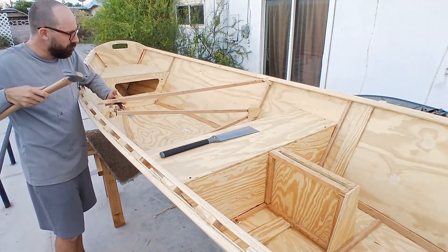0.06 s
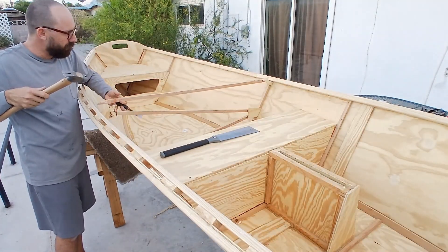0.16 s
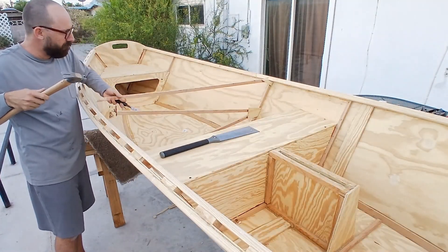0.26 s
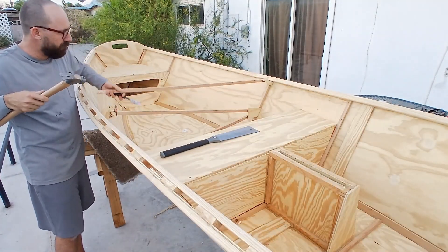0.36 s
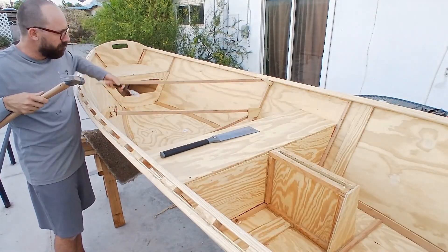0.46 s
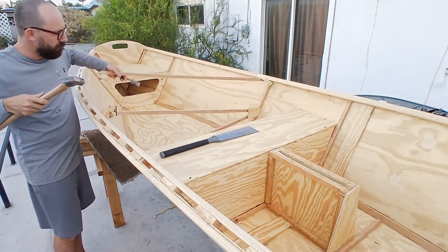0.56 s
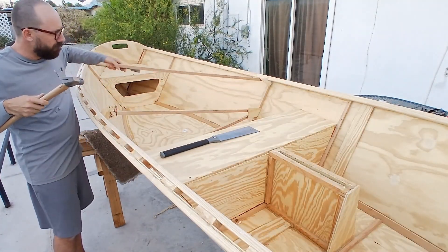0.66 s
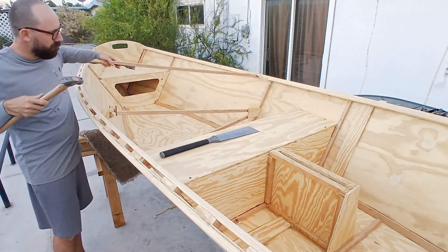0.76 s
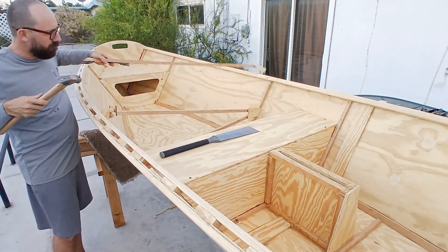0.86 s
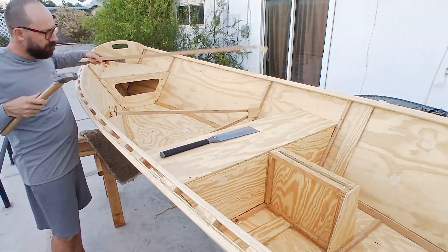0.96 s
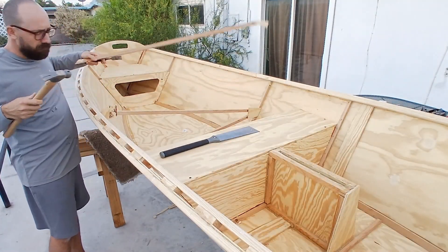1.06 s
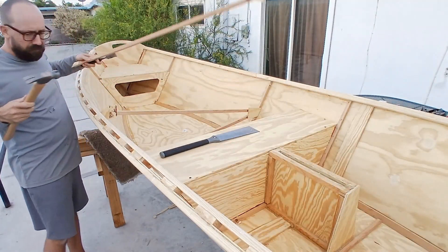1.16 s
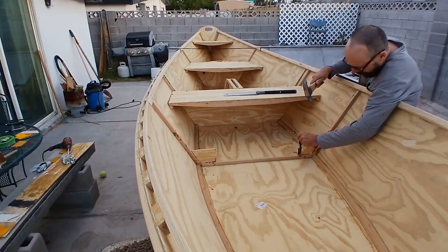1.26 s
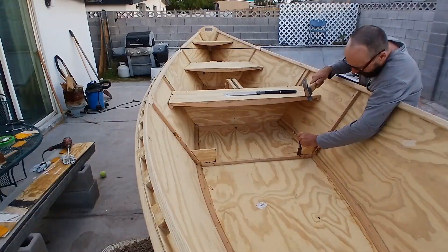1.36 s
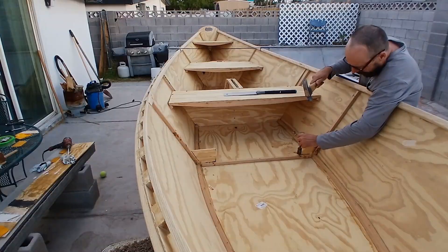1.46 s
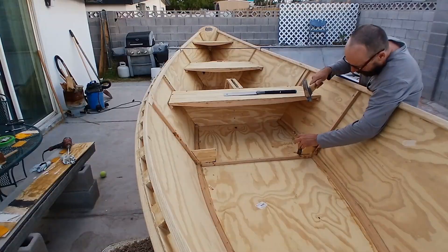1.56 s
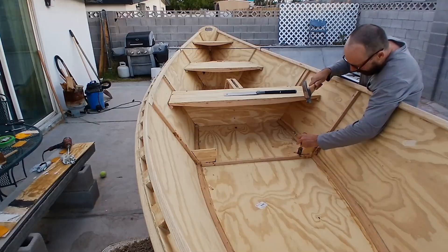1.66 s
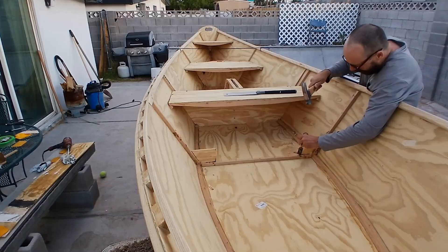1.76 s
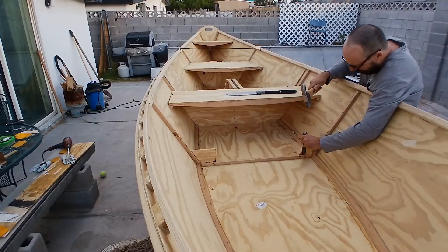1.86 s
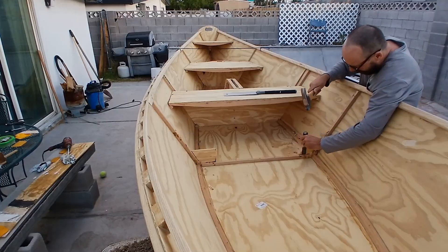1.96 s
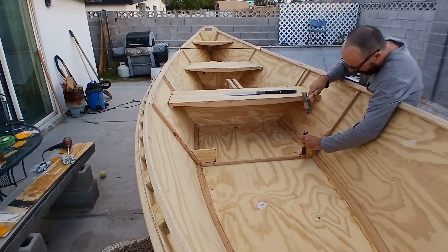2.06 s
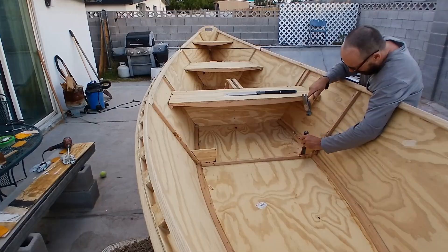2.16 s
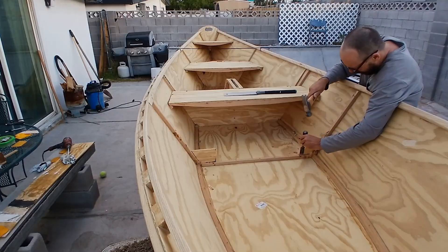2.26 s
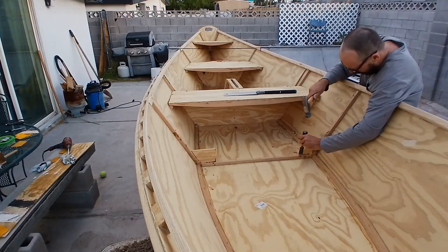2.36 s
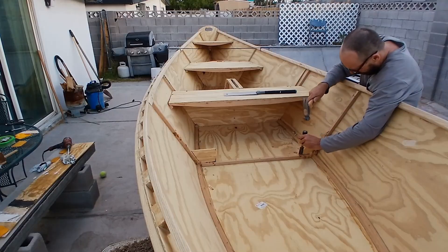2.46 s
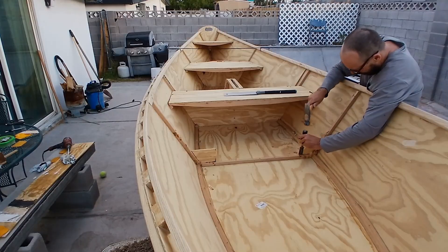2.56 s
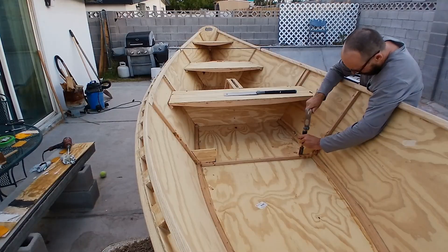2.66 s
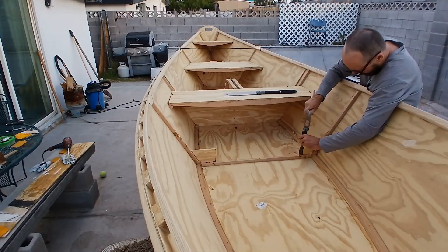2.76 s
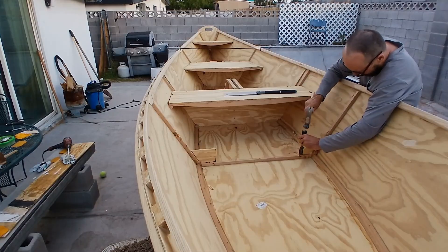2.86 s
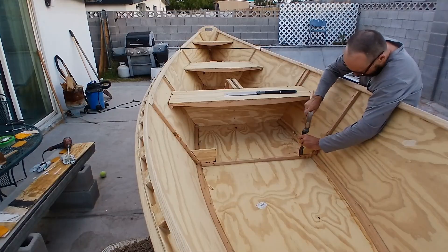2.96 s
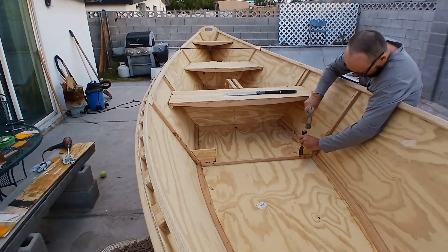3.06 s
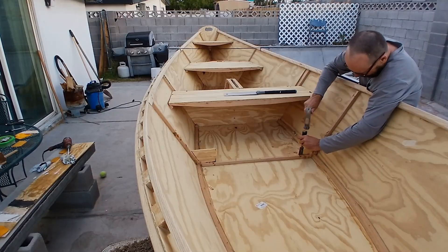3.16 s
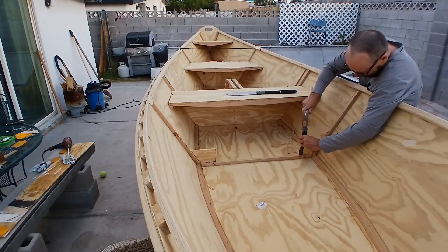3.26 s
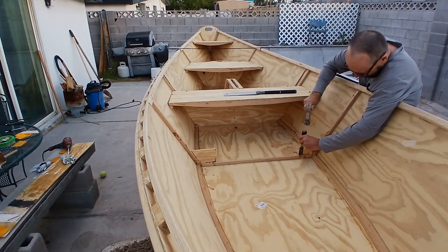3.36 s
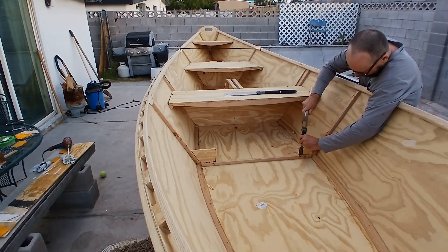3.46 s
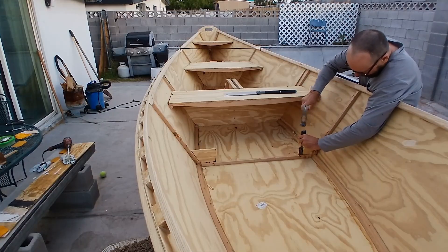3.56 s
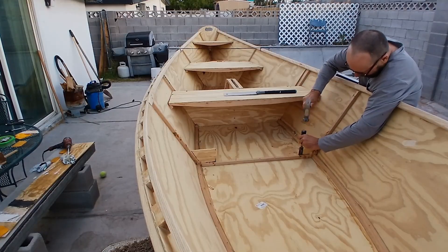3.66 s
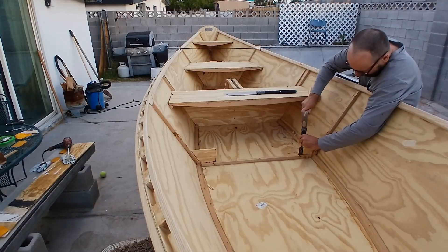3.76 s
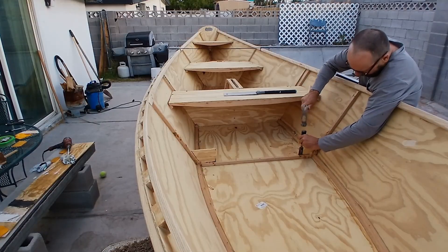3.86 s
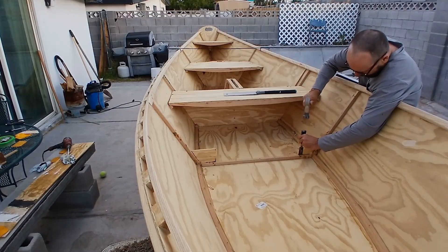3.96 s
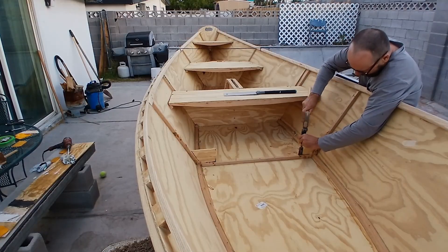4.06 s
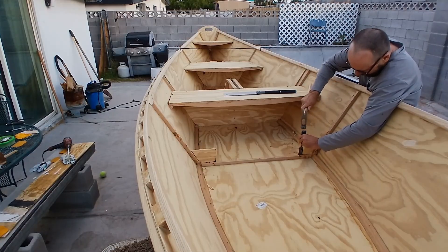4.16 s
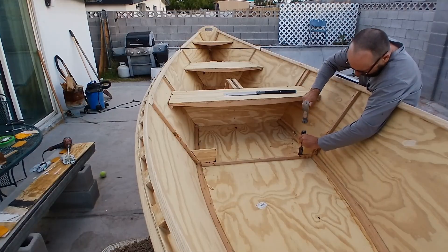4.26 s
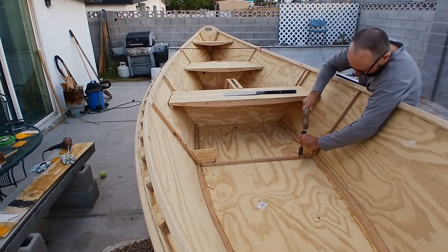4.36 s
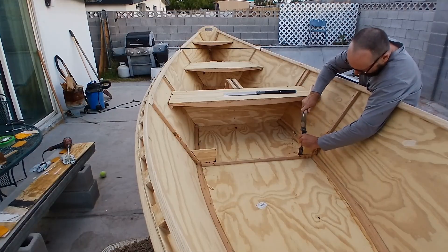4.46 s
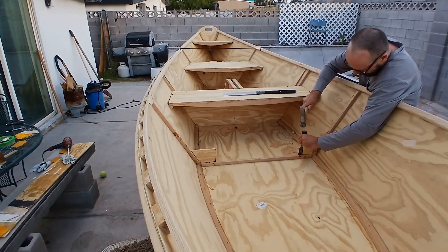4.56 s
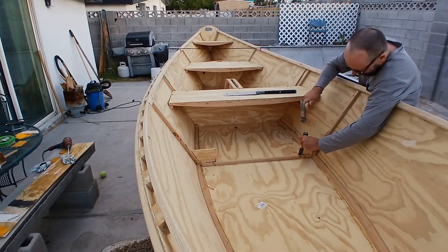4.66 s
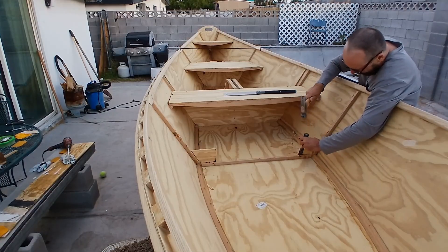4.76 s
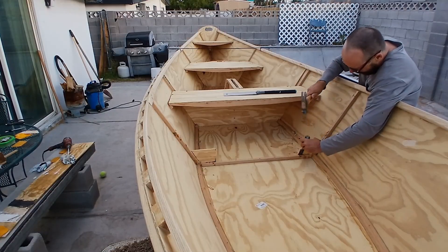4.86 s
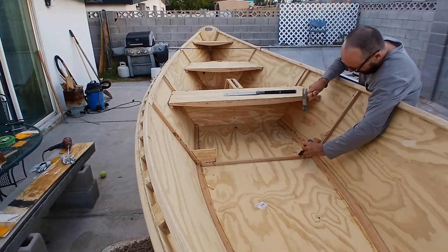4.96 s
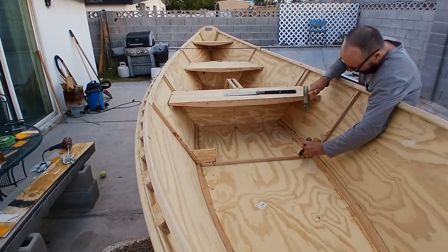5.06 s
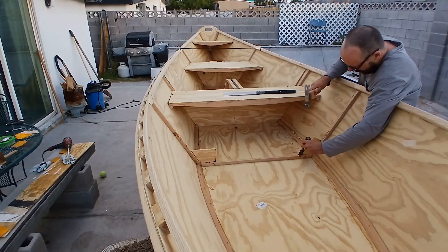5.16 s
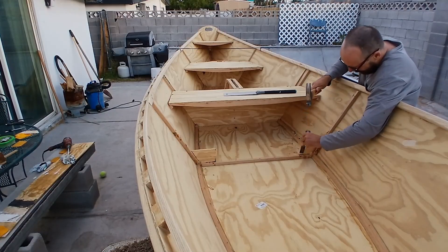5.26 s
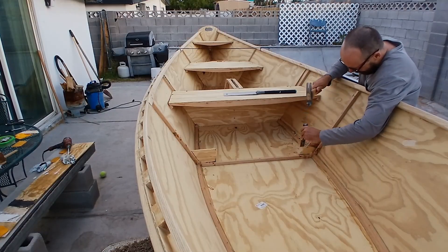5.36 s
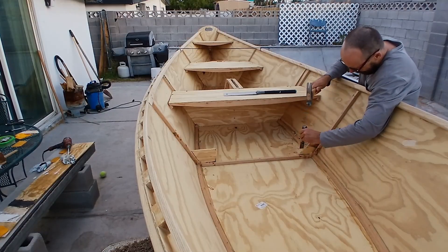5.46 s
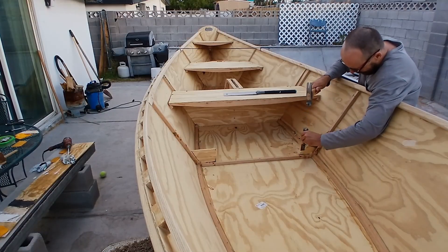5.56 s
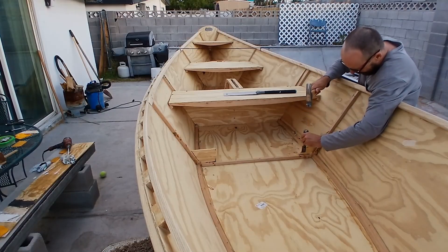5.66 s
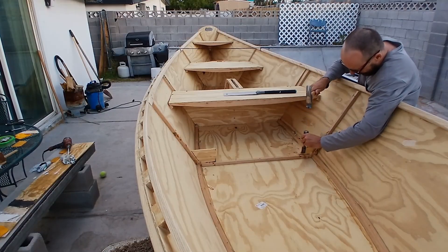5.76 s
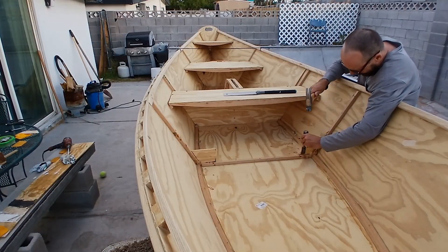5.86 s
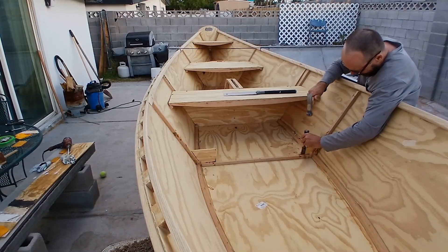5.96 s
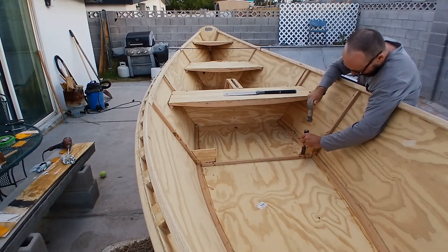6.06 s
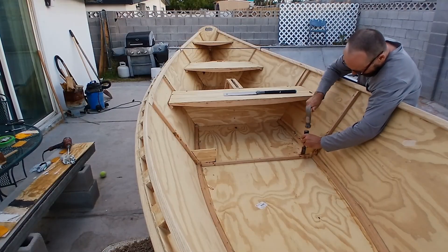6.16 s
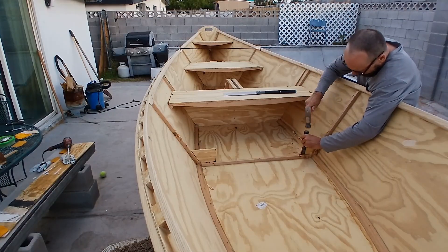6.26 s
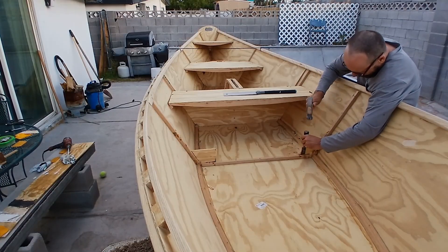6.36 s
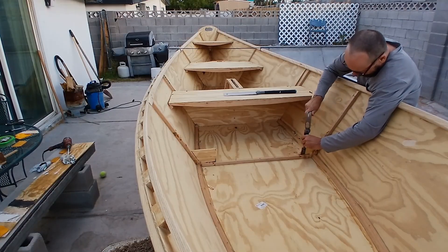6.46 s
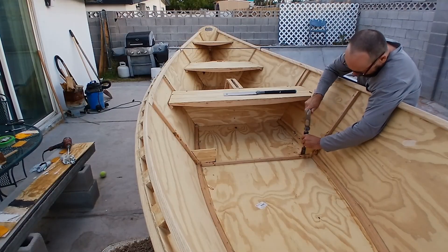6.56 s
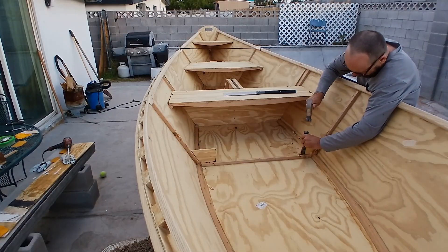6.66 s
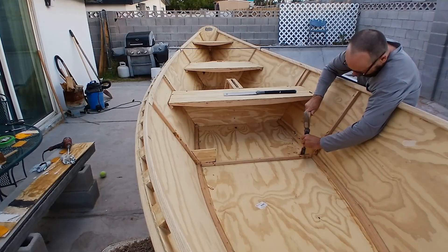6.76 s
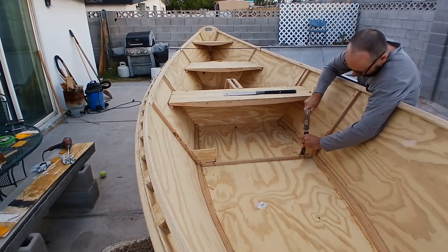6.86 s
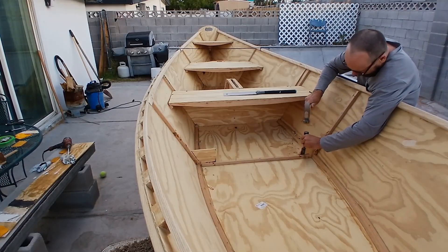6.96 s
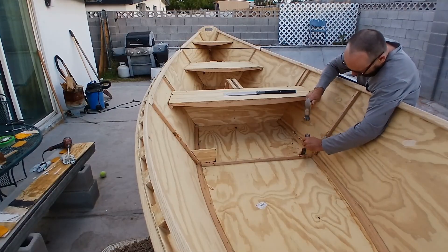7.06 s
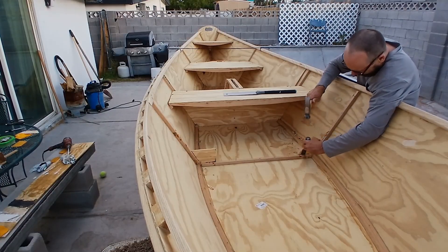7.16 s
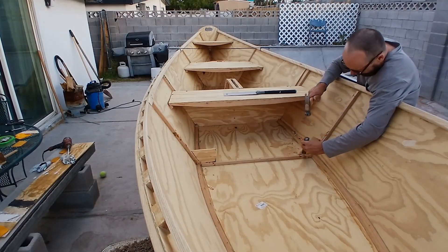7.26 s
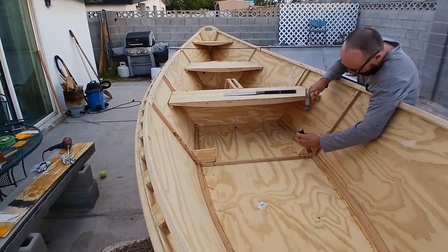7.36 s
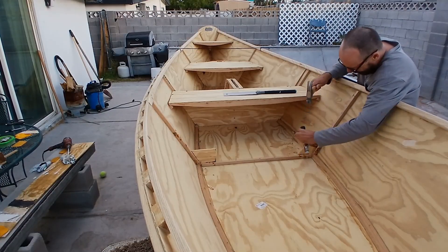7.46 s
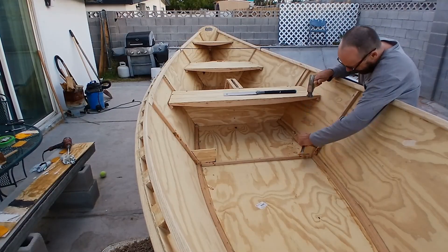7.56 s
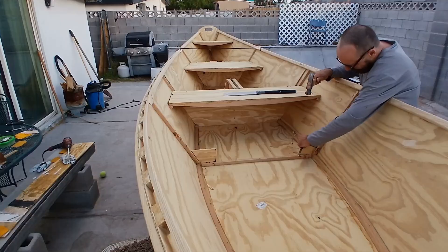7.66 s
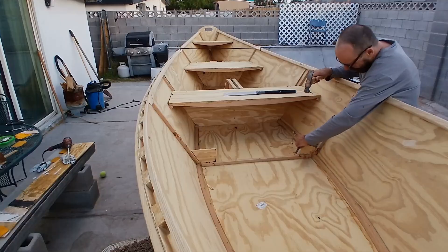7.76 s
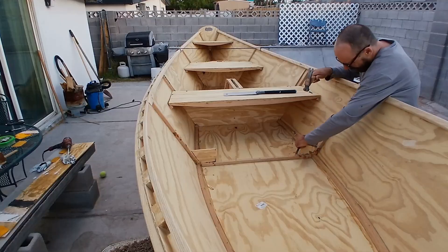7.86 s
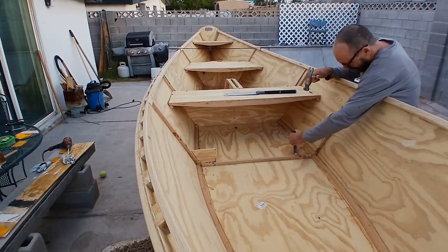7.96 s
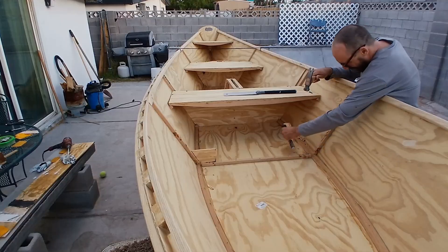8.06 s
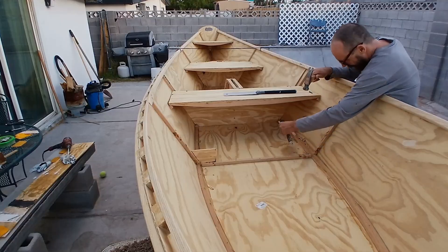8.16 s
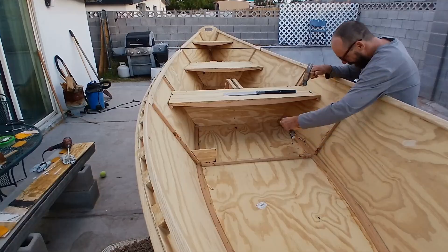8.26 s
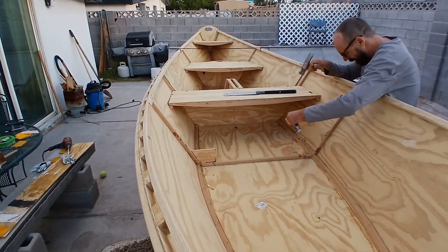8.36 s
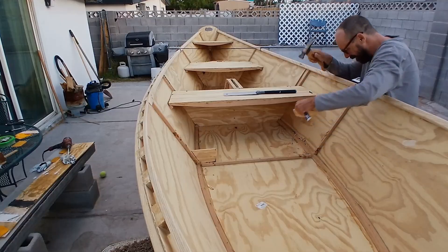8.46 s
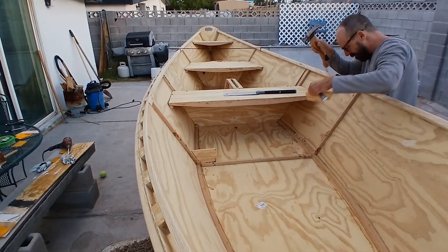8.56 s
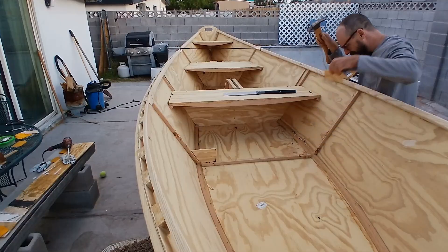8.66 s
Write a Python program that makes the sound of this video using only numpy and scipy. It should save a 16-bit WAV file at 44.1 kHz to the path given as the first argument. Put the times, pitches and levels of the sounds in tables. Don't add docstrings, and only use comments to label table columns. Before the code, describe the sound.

In a walled yard, two runs of loud hammer-on-chisel cracks shake a wooden hull, between light tool ticks, scuffs and faint traffic rumble.

```python
import sys
import numpy as np
from scipy import signal
from scipy.fft import irfft, next_fast_len
from scipy.io import wavfile
from scipy.ndimage import uniform_filter1d

SR = 44100
rng = np.random.default_rng(int(sys.argv[2]) if len(sys.argv) > 2 else 0)


def master(y):
    cut = np.clip(np.atleast_2d(y).T, -1, 1)
    pcm = np.round(cut * 32767)
    wavfile.write(sys.argv[1], SR, pcm.astype(np.int16))


def how_loud(loudness_db):
    steps = np.asarray(loudness_db, float) / 20
    return 10 ** steps


N = 383669
TIME = np.arange(N) / SR
GROWTH = TIME / TIME[-1]


def on_log(table, hz):
    f, v = np.transpose(table)
    return np.interp(np.log(hz), np.log(f), v)


def bass_share(hz):
    return np.clip(np.log2(1800 / hz), 0, 1)


def treble_share(hz):
    return np.clip(np.log2(hz / 4000), 0, 1)


def band_noise(hz, count):
    size = next_fast_len(N)
    f = np.fft.rfftfreq(size, 1 / SR)
    lo, hi = np.searchsorted(f, [hz * 2 ** (-1 / 3), min(hz * 2 ** (1 / 3), 16400)])
    window = np.cos(np.pi / 2 * 3 * np.log2(f[lo:hi] / hz))
    window = window * how_loud(-12 * (f[lo:hi] > 15850))
    draws = rng.standard_normal((count, hi - lo)) + 1j * rng.standard_normal((count, hi - lo))
    spec = np.zeros((count, len(f)), complex)
    spec[:, lo:hi] = window * draws
    return irfft(spec, size)[:, :N] * np.sqrt(size * SR) / 2


def walk(rate):
    k = int(SR / rate)
    held = np.repeat(rng.standard_normal(N // k + 1), k)
    return 1.6 * uniform_filter1d(uniform_filter1d(held, k), k)[:N]


def fades(start_s, level_db, t60_s, rise=0.0024):
    power = np.zeros(N)
    for s, db, t60 in np.broadcast(start_s, level_db, np.clip(t60_s, .004, 2)):
        i = int(s * SR)
        t = TIME[:min(int(1.2 * t60 * SR), N - i)]
        power[i:i + len(t)] += how_loud(2 * (db - 60 * t / t60)) * (1 - np.exp(-t / rise)) ** 2
    return np.sqrt(power)


BITE_S = .006


def ring(modes, gain, build, sag=0):
    hz, db, t60 = np.transpose(modes)[:3, :, None]
    t = TIME[:int(min(.9, 1.3 * np.max(t60)) * SR)]
    cycles = hz * (t + sag * BITE_S * (1 - np.exp(-t / BITE_S)))
    size = how_loud(db - 60 * t / t60) * (1 - np.exp(-t * hz / build))
    return gain @ (size * np.sin(2 * np.pi * cycles))


LEFT_LAG, CHISEL_LAG = 6, 3


def add(out, x, s, pan_db, left_lag=LEFT_LAG):
    for ch, lag, db in ((0, left_lag, pan_db / 2), (1, 0, -pan_db / 2)):
        i = int(s * SR) + lag
        x_ch = np.atleast_2d(x)[ch % np.ndim(x), :N - i]
        out[ch, i:i + len(x_ch)] += how_loud(db) * x_ch


def peak(x, db):
    return x * how_loud(db) / np.max(np.abs(x))


PANEL_DB, LOOSE_DB = -20.5, 9.5
SEATED_S, SEATING_S = 3.535, 0.68


def panel_level(s):
    return PANEL_DB - LOOSE_DB * np.clip((SEATED_S - s) / SEATING_S, 0, 1)


DUCK_DB, DUCK_SHARE = 18, .27
DUCK_ATTACK_S, DUCK_HOLD_S, DUCK_RELEASE_S = .06, 1, 0.41
CLICK_S, CLICK_DB = 1.2592, -29
BEFORE_CLICK_DB = 0.5


def duck():
    out = np.zeros(N)
    for s in np.array(BLOWS)[:, 0]:
        i = int(s * SR)
        t = TIME[:N - i]
        pulled = out[i] + DUCK_SHARE * (DUCK_DB - out[i]) * (1 - np.exp(-t / DUCK_ATTACK_S))
        out[i:] = pulled * np.exp(-np.maximum(t - DUCK_HOLD_S, 0) / DUCK_RELEASE_S)
    return out + BEFORE_CLICK_DB * (TIME < CLICK_S)


# pitch_hz, level_db (per Hz)
HISS = [(5000, -33), (8500, -17), (11000, -1), (13000, 0), (18000, 1)]
# pitch_hz, level_db
MIC = [(5000, 1), (7500, 1), (10000, 6.5), (12800, -9.5), (16000, -2.5)]
HISS_DB = -67


def hiss(hz, duck_db):
    return how_loud(HISS_DB - duck_db + on_log(HISS, hz) - on_log(MIC, hz) - 39.0)


# pitch_hz, level_db (per Hz)
STREET = [(15, -73), (25, -41), (43, -20.5), (67, -8.5), (92, -9.5), (160, -21), (273, -20.5), (323, -25),
          (499, -30), (536, -29), (828, -31), (1600, -39.5), (4000, -56.5), (6500, -67.5), (10400, -91),
          (17600, -120)]
STREET_DB, STREET_SWELL_DB, STREET_BRIGHTER_DB = -54.5, 6, 4.5
STREET_DUCK, DRONE_DUCK = 0.68, .6


def street(hz, duck_db):
    flicker_db = .8 * walk(9)
    level_db = STREET_DB + STREET_SWELL_DB * GROWTH - STREET_DUCK * duck_db
    brighter_db = STREET_BRIGHTER_DB * (1 - bass_share(hz)) * GROWTH
    return how_loud(level_db + on_log(STREET, hz) + 0.5 + flicker_db + brighter_db)


# time_s, pitch_hz
DRONE_HZ = [(0, 84.83), (1.25, 85.5), (1.4, 80.37), (2.0, 112.3), (2.3, 99.57), (5.5, 94.5), (7, 91.25),
            (8.7, 85.93)]
# time_s, level_db
DRONE_DB = [(0, -43), (.46, -34.5), (.89, -54), (1.19, -35.5), (1.5, -25.5), (1.94, -33), (2.62, -35),
            (4.5, -35.5), (4.94, -36.5), (5.3, -39.5), (6.08, -27), (7.05, -27), (7.39, -29), (7.8, -29.5),
            (7.97, -35.5), (8.38, -29.5), (8.7, -29.5)]
# time_s, left_minus_right_db
DRONE_PAN_DB = [(0, -1.6), (7.6, -1.4), (8.1, 0), (8.7, 0)]
SWAY_DB, SWAY_RISE_S, SWAY_T60_S = -11.5, 0.14, 0.7


def drone(duck_db):
    hz = np.interp(TIME, *np.transpose(DRONE_HZ)) * (1 + 0.022 * walk(3))
    slow_filter = signal.butter(3, 10, fs=SR, output="sos")
    slow = signal.sosfilt(slow_filter, rng.standard_normal((2, N)))
    x = np.real((slow[0] + 1j * slow[1]) * np.exp(2j * np.pi * np.cumsum(hz) / SR))
    s, _, hull_db = np.transpose(BLOWS)[:3]
    engine = how_loud(np.interp(TIME, *np.transpose(DRONE_DB)))
    sway = fades(s, hull_db + SWAY_DB, SWAY_T60_S, rise=SWAY_RISE_S)
    size = np.hypot(engine, sway) * how_loud(-DRONE_DUCK * duck_db - 2.0)
    pan_db = np.interp(TIME, *np.transpose(DRONE_PAN_DB)) * [[.5], [-.5]]
    return x / np.std(x) * size * how_loud(pan_db)


# start_s, length_s, from_hz, to_hz, level_db
BIRD = [
    (5.128, .055, 4080, 3080, -80),
    (5.187, .057, 3100, 2770, -77),
]


def bird():
    out = np.zeros(N)
    flutter, waver = how_loud(3.0 * walk(90)), 1 + .012 * walk(120)
    for s, length, from_hz, to_hz, db in BIRD:
        share = np.clip((TIME - s) / length, 0, 1)
        hz = from_hz + (to_hz - from_hz) * share ** 2
        tone = np.sin(2 * np.pi * np.cumsum(hz * waver) / SR)
        out += how_loud(db) * np.sin(np.pi * share) * flutter * tone
    return out


# start_s, length_s, pitch_hz, level_db
CREAKS = [(3.6, .04, 1500, -66), (0.625, 0.075, 8600, -70), (2.19, .04, 2700, -66), (2.245, .03, 3600, -68),
          (2.285, 0.04, 3000, -64), (3.984, 0.018, 3026, -58), (3.979, 0.035, 1514, -64),
          (4.012, .025, 3282, -66), (4.155, .03, 2450, -62), (4.2, .08, 1400, -65), (4.2, .04, 4000, -64),
          (4.93, .02, 2400, -62), (5.265, 0.06, 980, -58), (5.28, .035, 4750, -60),
          (5.281, 0.055, 3650, -60), (5.345, .015, 3700, -57), (5.31, 0.05, 1700, -66),
          (5.36, 0.032, 700, -58), (5.308, 0.025, 2650, -59), (5.34, 0.025, 2300, -62),
          (5.325, 0.05, 720, -48), (5.345, 0.026, 370, -54), (5.372, .02, 310, -53), (6.85, .06, 1500, -63),
          (7.02, .03, 3800, -66)]
CREAK_BLUR_HZ, CREAK_STEADY = 1500, .6


def creaks():
    out, grip = np.zeros((2, N)), walk(220) + 1j * walk(300)
    for row, (s, length, hz, db) in enumerate(CREAKS):
        t = TIME[:int(length * SR)]
        steps = row * 9973 + t * SR * max(hz / CREAK_BLUR_HZ, .5)
        own_grip = grip[steps.astype(int) % N]
        tone = np.imag((CREAK_STEADY + own_grip) * np.exp(2j * np.pi * hz * t))
        add(out, how_loud(db + 6.0) * np.sin(np.pi * t / length) * tone, s, -2.5)
    return out


def bare_click():
    out = np.zeros((2, N))
    out[:, int(CLICK_S * SR):][:, :40] += how_loud(CLICK_DB) * np.exp(-np.arange(40) / 5)
    return out


# start_s, length_s, level_db, over_6khz_db, under_1500hz_db
SCUFFS = [(0.393, 0.18, -47, -8, 2), (0.598, 0.15, -58.5, 4, -18), (.92, .045, -78, 18.5, -3),
          (0.993, .035, -74.5, 13.5, -3), (1.313, 0.054, -58, -8, 13), (1.785, 0.2, -52, -1.5, 0),
          (2.16, 0.13, -56, -8, 13.5), (2.296, 0.069, -57.5, -6, -5), (4.6, .19, -58, 2, -6),
          (4.85, 0.12, -56, 2, 6), (5.242, 0.17, -48, -8, 10), (6.84, .42, -62, -15, -3),
          (7.315, 0.38, -66.5, 2.5, -3), (7.72, .15, -63, -4, -3), (7.879, 0.059, -41.5, -2, 9),
          (8.354, 0.13, -65.5, 8, -13)]
SCUFF_GRIP, SCUFF_LIFT, SCUFF_EASE_DB = .3, .38, 3


def scuff_levels():
    rows = []
    shape = ((0, -30), (SCUFF_GRIP, 0), (1 - SCUFF_LIFT, -SCUFF_EASE_DB), (1, -30))
    for s, length, db, high_db, low_db in SCUFFS:
        rows.append((s - .001, how_loud(-70), high_db, low_db))
        for share, down_db in shape:
            rows.append((s + share * length, how_loud((db + down_db) / 2), high_db, low_db))
        rows.append((s + length + .001, how_loud(-70), high_db, low_db))
    rows = np.array(rows)
    size, high, low = (np.interp(TIME, rows[:, 0], rows[:, k]) for k in (1, 2, 3))
    return 2 * 20 * np.log10(size), high, low


# pitch_hz, width_hz, level_db
SCUFF_RING = [(720, 50, -3), (970, 67, -23), (2600, 1400, -1), (3600, 300, -6), (4760, 620, -12.5)]
# pitch_hz, level_db (per Hz)
TICK = [(250, -0.5), (600, -5), (2000, -8), (2700, 1), (3400, -1), (4500, -1.5), (7000, -3), (10000, 2.5),
        (16000, -5)]


def scuffs(hz, levels, grit, press):
    level_db, high_db, low_db = levels
    body = sum(how_loud(db) / np.hypot(1, 2 * (hz - f) / (w + hz / 5)) for f, w, db in SCUFF_RING)
    tilt_db = bass_share(hz) * (low_db - 3.5) + treble_share(hz) * (high_db - 8.0 + on_log(TICK, hz))
    thin_db = 4.4 * max(np.log2(600 / hz), 0)
    return grit * press * (0.9 + body) * how_loud(level_db - 47.5 + tilt_db - thin_db)


# start_s, peak_db, under_1200hz_db, over_6khz_db
SPLINTERS = [(0.045, -48.5, -30, -5), (0.3202, -36, 0, -3.5), (0.405, -32.5, -3, 2), (.42, -39, -10, -3),
             (1.351, -40, 14.5, -28), (2.835, -37, 6, -20.5), (3.1242, -33.5, -3, -26),
             (4.5812, -24.5, -28.5, -1), (4.6176, -22, -11.5, -8.5), (4.68, -28.5, -16, -2.5),
             (4.8439, -19, -10.5, -10.5), (5.62, -69, 6, -37), (5.904, -46.5, 13, -22),
             (7.1193, -50, -20, -41), (7.4605, -43, 21.5, -50), (7.779, -34.5, -40, -10.5),
             (8.3005, -44.5, -14, -30)]
# start_s, peak_db, under_1200hz_db, over_6khz_db
TICKS = [(0.1237, -43, 7, -19), (0.4265, -17.5, -13, -3), (0.4327, -19.5, -1.5, -11), (0.689, -52, -20, -4),
         (1.81, -50, -20, -20), (1.8549, -36.5, -4, -16), (2.521, -43.5, -21, -18),
         (2.7104, -40, -13.5, -11), (3.1733, -62, 26, 8), (3.693, -40.5, -0.5, -26),
         (3.9851, -54, -6.5, -36), (4.7524, -43, -29.5, -2), (4.768, -45, -25, -4),
         (4.8231, -38, -18.5, -4.5), (4.8863, -31.5, 2.5, -4), (4.934, -43, -20, -8.5),
         (5.7694, -53.5, 1.5, -15), (7.698, -55, -5, -24), (7.864, -38, 7, -18), (7.9023, -36.5, 3.5, -8),
         (8.058, -53, -15, -20), (8.1883, -56, -15, -10)]
SPLINTER_T60_S, SPLINTER_PAN_DB, TICK_T60_S, TICK_PAN_DB = 0.038, -14, 0.058, -8.5


def ticks(hz, grit):
    rows = [(*row, SPLINTER_T60_S, SPLINTER_PAN_DB) for row in SPLINTERS]
    rows += [(*row, TICK_T60_S, TICK_PAN_DB) for row in TICKS]
    s, peak_db, low_db, high_db, t60, pan_db = np.transpose(sorted(rows))
    high = treble_share(hz)
    band_db = peak_db - 40.5 + bass_share(hz) * (low_db + 5) + high * (high_db - 4) + on_log(TICK, hz)
    snap = fades(s, band_db - 3.5, 0.0024, rise=0.00016)
    snap += fades(s, band_db + 1.0, t60, rise=0.00065)
    snap += fades(s + 0.0074, band_db - 4.5, .006, rise=.0002)
    side_db = .5 * np.interp(TIME, s, pan_db)
    direct = grit * snap * how_loud(np.array([side_db, -side_db]) / (2 + 2.3 * high))
    echo = fades(s, band_db - 11.5, 3.86 * t60, rise=0.0013)
    return direct, echo


# start_s, peak_db, pitch_hz, t60_s
PINGS = [(.0445, -45, 4080, .04), (.0445, -49, 4600, .05), (.0445, -53, 5130, .04), (.083, -54, 4080, .05),
         (.083, -59, 4600, 0.04), (.122, -58, 4600, .04), (.172, -61, 5100, 0.04), (.176, -60, 4100, .04),
         (.3215, -32, 4530, 0.018), (.4054, -28, 9200, 0.0046), (.4054, -27.5, 13500, .004),
         (.4056, -32, 3580, .012), (.412, -42, 3600, .015), (.4266, -15.5, 8000, 0.0052),
         (.4268, -25, 11000, .005), (.4312, -19.5, 2500, .012), (.4312, -21, 7800, 0.0087),
         (.4325, -25, 13500, 0.0074), (.4378, -23, 4005, .008), (.6875, -52, 8300, .01),
         (1.811, -50, 3500, .03), (1.855, -43, 4600, 0.065), (4.583, -28, 4950, 0.017),
         (4.6177, -17, 3850, .012), (4.684, -31, 9800, 0.024), (4.8448, -22, 2700, 0.03),
         (4.8485, -26.5, 7000, .01), (4.887, -31, 5030, .012), (4.893, -35, 9500, .015),
         (7.7795, -48, 5200, .008), (7.46, -36.5, 3000, .04), (3.124, -45, 3150, .03),
         (3.172, -55, 3000, .04), (2.836, -44.5, 3000, .03), (7.781, -28.5, 2710, 0.023),
         (7.865, -42, 4700, .01), (7.868, -29, 2880, .012), (7.903, -33, 3110, .03),
         (7.914, -38.5, 10180, .01), (7.12, -43, 2700, .02), (7.12, -45, 4000, .015),
         (4.583, -27, 2600, .02), (4.6225, -30, 9500, .012), (4.6225, -28, 2900, .015),
         (4.682, -30, 2700, .02), (4.893, -36, 4400, .02), (4.92, -42, 4500, .015),
         (4.936, -44, 4300, .015), (2.7295, -16, 4200, .02), (2.735, -19, 4900, .02),
         (4.8235, -38, 3660, .015)]
# start_s, peak_db, pitch_hz, t60_s
NOTES = [(.124, -42, 850, .04), (.127, -38, 1050, 0.11), (.126, -44, 1410, .07), (.126, -50, 2400, .05),
         (.155, -33.5, 230, 0.14), (.36, -30.5, 130, 0.18), (2.522, -31.5, 302, 0.24),
         (5.155, -31, 352.3, 0.11), (5.155, -43, 694, 0.069), (5.4, -40.5, 337, 0.14),
         (5.732, -39.5, 321, 0.18), (7.46, -22.5, 325, 0.14), (7.46, -27.5, 750, 0.05),
         (7.468, -28, 615, 0.077), (7.466, -44, 1270, 0.065), (7.547, -33, 738, .05),
         (7.556, -45.5, 1255, .06), (4.85, -43, 720, .08), (4.63, -45, 1200, .03)]


def pings():
    out = np.zeros((2, N))
    for table, pan_db in ((PINGS, -2.5), (NOTES, -2.2)):
        for (s, db, hz, t60), c in zip(table, rng.standard_normal((len(table), 2))):
            pair = [(hz, 0, t60), (hz * (1 + .04 * c[0]), -7, t60)]
            add(out, peak(ring(pair, np.ones(2), 2.5), db), s, pan_db + c[1])
    return out


# start_s, peak_db, hull_boom_db, centre_hz, t60_s
KNOCKS = [(0.124, -37.5, -36, 1201, 0.24), (0.453, -29.5, -29.5, 332, 0.32), (1.353, -24, -25.5, 276, 0.35),
          (1.862, -39, -37, 322.7, 0.72), (2.522, -25, -22.5, 380.2, 0.26), (5.155, -35, -32, 320, 0.2),
          (5.402, -42.5, -45, 343, 0.16), (5.732, -46, -39, 328, 0.17), (7.461, -24.5, -22.5, 450, 0.25),
          (7.55, -30, -24, 315.5, 0.23), (7.867, -32, -35.5, 699, 0.097), (7.919, -32.5, -29, 291, 0.11)]
KNOCK_SPREAD_OCT = 1


def knocks():
    out = np.zeros((2, N))
    chance = rng.standard_normal((len(KNOCKS), 100))
    octaves = np.arange(-20, 20) / 10
    crowd_db = -5.0 * (octaves / KNOCK_SPREAD_OCT) ** 2 - 3.0 * octaves
    for (s, db, hull_db, hz, t60), c in zip(KNOCKS, chance):
        crowd_hz = hz * 2 ** (octaves + .04 * c[:40])
        crowd = np.c_[crowd_hz, crowd_db, t60 * (hz / crowd_hz) ** .6]
        gain = np.sign(c[40:80]) * how_loud(1.6 * c[:40])
        add(out, peak(ring(crowd, gain, 0.35), db + 3.5), s, -2.2)
        add(out, peak(ring(HULL, c[80:80 + len(HULL)], 7.2), hull_db + 3.5), s, -1.5)
    return out


# pitch_hz, level_db (per Hz)
YARD = [(29, -32.5), (50, -17), (108, -10), (184, -16), (337, -22.5), (420, -23), (630, -29), (1500, -30.5),
        (3000, -41.5), (4600, -48), (6500, -51.5), (16000, -83.5)]
# pitch_hz, t60_s
YARD_T60 = [(60, 1), (160, 0.56), (420, 0.36), (1100, 0.22), (3000, 0.26), (8000, 0.15), (15000, 0.76)]
WALL_S, WALL_DB = .072, -10
LOOSE_BELOW_HZ = 1100


def yard(hz):
    s, crack_db, hull_db = np.transpose(BLOWS)[:3]
    if hz < 200:
        blow_db = hull_db + 0.5
    else:
        blow_db = panel_level(s) + 15 if hz < LOOSE_BELOW_HZ else crack_db
    patchy = how_loud(1.5 * walk(60))
    echoes = patchy * fades(s + 0.012, blow_db + on_log(YARD, hz) - 22.5, on_log(YARD_T60, hz), rise=0.001)
    return echoes + fades(s + WALL_S, crack_db + on_log(CRACK, hz) - 67.0 + WALL_DB, 0.018)


# pitch_hz, level_db (per Hz)
CRACK = [(350, -29), (600, -9.5), (1260, -7), (2010, -2.5), (2500, -8), (3250, 2.5), (3630, -7),
         (8390, -31.5), (10700, -23), (16000, -55)]


def cracks(hz):
    s, crack_db, _, top_db, _ = np.transpose(BLOWS)
    high = treble_share(hz)
    band_db = crack_db + on_log(CRACK, hz) - 30.0 + high * (top_db + 34)
    band_db = band_db + 0.7 * (hz < LOOSE_BELOW_HZ) * (panel_level(s) - PANEL_DB)
    crack = fades(s, band_db, 0.026 + 40 / hz, rise=0.0036)
    crack += fades(s - .005, band_db - 15.5, 0.023, rise=0.0056)
    return crack * how_loud(np.array([[-2], [2]]) * (1.5 - high))


BANDS = 35 * 2 ** np.arange(0, 9.2, 1 / 3)


def noisy(duck_db):
    out = np.zeros((2, N))
    drag_levels = scuff_levels()
    grit = how_loud(2.5 * walk(400))
    press = uniform_filter1d(grit, size=900)
    alike = [(60, 0.95), (130, 0.93), (290, 0.83), (640, 0.019), (1400, 0.089), (3000, -0.038)]
    for hz in BANDS:
        near, mid, side = band_noise(hz, count=3)
        far = yard(hz) + street(hz, duck_db)
        direct = 0
        if hz > 250:
            tick_direct, tick_echo = ticks(hz, grit)
            direct = cracks(hz) + tick_direct
            far += tick_echo + scuffs(hz, drag_levels, grit, press)
        if hz > 4000:
            far += hiss(hz, duck_db)
        like = on_log(alike, hz)
        apart = np.sqrt(max(1 - like, 0) / 2) * side * np.array([[1], [-1]])
        pair = np.sqrt((1 + like) / 2) * mid + apart
        scatter = .3 + .4 * treble_share(hz)
        left = np.sqrt(1 - scatter) * np.roll(near, LEFT_LAG) + np.sqrt(scatter) * side[::-1]
        heard = far * pair * how_loud([[-.8], [.8]]) + direct * np.array([left, near])
        out += how_loud(on_log(MIC, hz)) * heard
    return out


# start_s, crack_peak_db, hull_boom_db, treble_db, crack_pitch_hz
BLOWS = [
    (2.7289, -10.5, -8.5, -25, 2683),
    (2.969, -10, -8.5, -23.5, 2427),
    (3.212, -10, -9.5, -20.5, 2490),
    (3.457, -10.5, -8.5, -21.5, 2710),
    (3.7494, -8.5, -10.5, -22, 2662),
    (4.07, -8.5, -11, -23.5, 2477),
    (4.4142, -9.5, -10.5, -26, 2733),
    (6.2173, -10, -9.5, -22.5, 2733),
    (6.485, -10, -8.5, -20.5, 2866),
    (6.764, -6, -14, -24, 2714),
]
# seat_plank_db, rib_db, panel_db, blade_ring_share (of its t60), shank_db
LANDING = [
    (7, 3.5, -2, 1.2, 3),
    (-3, 1.5, -9.5, 1.14, 3.5),
    (-0.5, 1.5, -6, 0.74, -0.5),
    (3, -1, 1.5, 0.69, 0),
    (3.5, -3, 1, 0.8, -0.5),
    (2, -3, 0.5, 1.3, -2.5),
    (5, 2.5, 1.5, .6, 5),
    (-3, 0.5, -2, 0.63, -1),
    (-3.5, -2, -1.5, 0.54, -4.5),
    (-12.5, -8, 2.5, .6, -11.5),
]
# pitch_hz, level_db, t60_s, side_of_node (+-1)
HULL = [(64.2, -5.9, .17, -1), (70.2, -26.8, .99, -1), (75.7, -11.7, .39, -1), (87.8, 9.2, .12, 1),
        (99.5, -16.5, 1.0, 1), (116.5, -4.8, .28, -1), (123.2, -1.6, .12, 1), (144.3, -24, 1.0, -1),
        (176.8, -11.1, .14, 1), (187.4, -31, 1.0, -1), (191.8, -13.5, .1, 1), (266, -11, .12, 1),
        (438, -21, .08, 1), (525, -19, .09, 1)]
HULL_BUILD_CYCLES, HULL_LATE_S, HULL_VARY_DB = 3.7, .001, .25


def hull_boom(out, blow, panel_db, c):
    s, hull_db = blow[0], blow[2]
    hz, sides = np.array(HULL)[:, 0], np.array(HULL)[:, 3]
    upper_db = (hz > 200) * (panel_level(s) - PANEL_DB + panel_db)
    gain = sides * how_loud(HULL_VARY_DB * c[:len(HULL)] + upper_db)
    add(out, how_loud(hull_db + 10.5) * ring(HULL, gain, HULL_BUILD_CYCLES), s + HULL_LATE_S, -1.5)


# pitch_hz, level_db, t60_s
PANEL = [(220, -17.5, 0.19), (248, -8, 0.17), (287.5, -5.5, 0.27), (309.8, -4, 0.11), (350.3, -9.5, 0.35),
         (429, -5.5, 0.2), (519.4, -5.5, 0.18), (591, -14, 0.3), (683, -15, 0.28), (794, -7, 0.13),
         (1000, -9.5, 0.12), (1150, -7, 0.043)]
# pitch_hz, level_db, t60_s
PLANK = [(970, -13, 0.041), (1082, -10, 0.048), (1265, 1, 0.06), (1426, -8.5, .07), (1460, -8, 0.096)]
# pitch_hz, level_db, t60_s
RIB = [(1613, -4, 0.087), (1746, -3, .06), (1890, -4, .07), (1970, -8.5, .06), (2310, -7.5, 0.066),
       (2430, -6.5, 0.052), (2710, -5.5, .05), (2660, -9, .05)]
FRAME_DB, FRAME_BUILD_CYCLES = -7, 5.5
PORT_SPREAD_DB = 3


def panels_and_frame(out, blow, landing, c):
    s, crack_db = blow[:2]
    plank_db, rib_db, panel_db = landing[:3]
    ports = np.array([[1], [-1]])
    struck = np.sign(c[20:32]) * how_loud(1.5 * c[32:44])
    panel = ring(PANEL, struck * how_loud(PORT_SPREAD_DB * ports * c[168:180]), 0.88)
    add(out, peak(panel, panel_level(s) + 6.5 + panel_db), s, -2.2)
    for part, db, k in ((PLANK, plank_db, 180), (RIB, rib_db, 190)):
        gain = np.sign(c[k:k + len(part)]) * how_loud(2 * c[k + 20:k + 20 + len(part)])
        balance = how_loud(PORT_SPREAD_DB * ports * c[:len(part)])
        add(out, how_loud(crack_db + FRAME_DB + db) * ring(part, gain * balance, FRAME_BUILD_CYCLES), s, -6)


# pitch_hz, level_db, t60_s
CHISEL = [(3150, -11.5, .016), (3600, -10, 0.028), (4115, -9, 0.025), (4417, -13, 0.015),
          (4860, -12, 0.015), (5360, -18.5, 0.012)]
# share_of_crack_pitch, level_db, t60_s
BLADE = [(.8, -7, .03), (.92, -0.5, .028), (1.0, -1, 0.03), (1.06, -6.5, 0.02)]
# pitch_hz, level_db (under the crack), t60_s
STEEL = [(5173, -33.5, .21), (5240, -36, .16), (3031, -33, .23), (3150, -36, .2), (1545, -29, .2),
         (1906, -29, .17), (2223, -31, .16)]
BITE_SAG = .1
BOUNCE_SHARE, BOUNCE_FADE = 0.47, 320


def chisel_ring(out, blow, landing, c):
    s, crack_db, crack_hz = blow[0], blow[1], blow[4]
    free, shank_db = landing[3:]
    listed = np.vstack([CHISEL, np.array(BLADE) * [crack_hz, 1, free]])
    modes = np.repeat(listed, 3, axis=0) * np.c_[1 + .03 * c[140:170], np.ones((30, 2))]
    chisel = ring(modes, np.sign(c[45:75]) * how_loud(1.5 * c[75:105]), 2.2, BITE_SAG)
    heard = []
    for when, size in (c[110:122].reshape(2, 6), c[122:134].reshape(2, 6)):
        bounces = np.zeros(500)
        bounces[0] = 1
        late = (40 + 100 * np.abs(when)).astype(int).clip(1, 499)
        bounces[late] = BOUNCE_SHARE * size * np.exp(-late / BOUNCE_FADE)
        heard.append(np.convolve(chisel, bounces))
    pair = .35 * heard[0] + .65 * np.array(heard)
    add(out, peak(pair, crack_db + 2.5), s, -4.5, CHISEL_LAG)
    add(out, how_loud(crack_db + 1 + shank_db) * ring(STEEL, np.ones(len(STEEL)), 4.6), s, -2)


def hammer():
    out = np.zeros((2, N))
    chance = rng.standard_normal((len(BLOWS), 220))
    for blow, landing, c in zip(BLOWS, LANDING, chance):
        hull_boom(out, blow, landing[2], c)
        panels_and_frame(out, blow, landing, c)
        chisel_ring(out, blow, landing, c)
    return out


def scene():
    duck_db = duck()
    background = drone(duck_db) + noisy(duck_db) + bird()
    handling = creaks() + bare_click() + pings() + knocks()
    return background + handling + hammer()


def band_limit(x):
    return signal.sosfilt(signal.butter(12, 16510, fs=SR, output="sos"), x)


def record(dry):
    x = signal.sosfilt(signal.butter(2, 35, "high", fs=SR, output="sos"), dry)
    x = x / (1 + x ** 4) ** .25 * .97
    x = signal.sosfilt(signal.ellip(8, .2, 60, 16300, fs=SR, output="sos"), x)
    return band_limit(x)


dry = scene()
out = record(dry)
master(out)
```